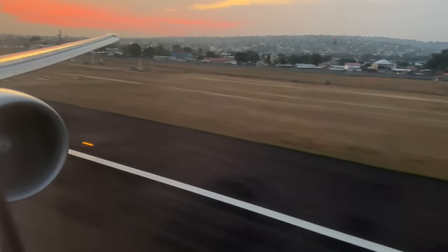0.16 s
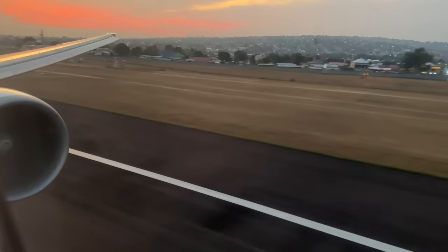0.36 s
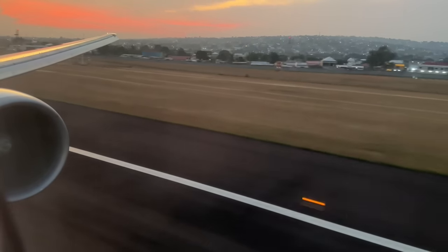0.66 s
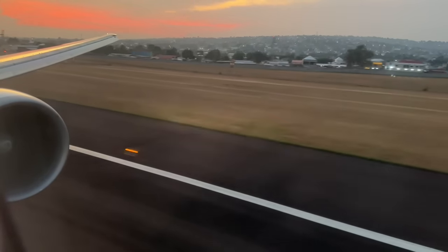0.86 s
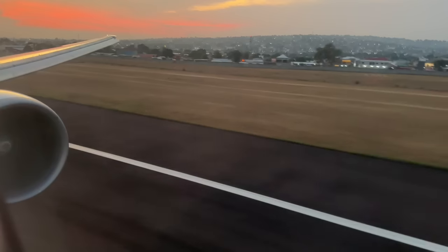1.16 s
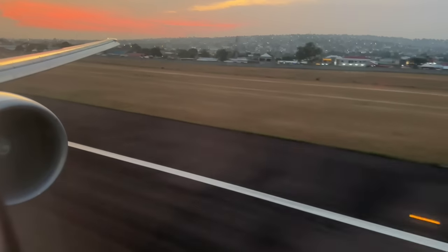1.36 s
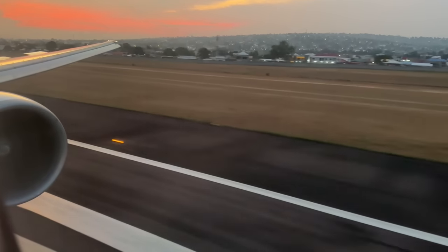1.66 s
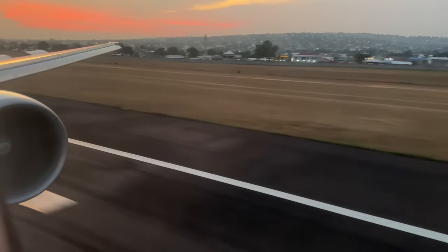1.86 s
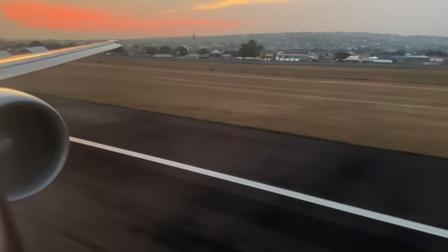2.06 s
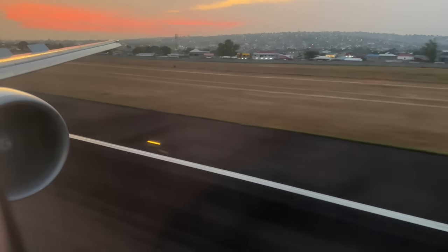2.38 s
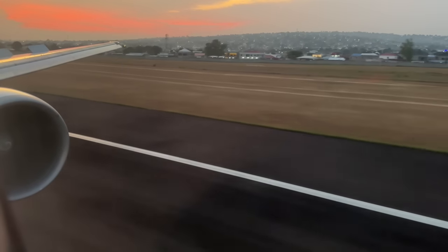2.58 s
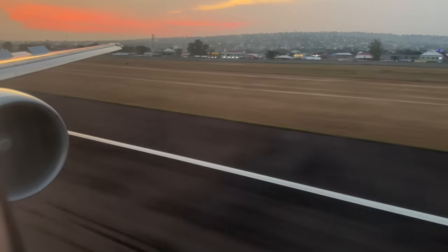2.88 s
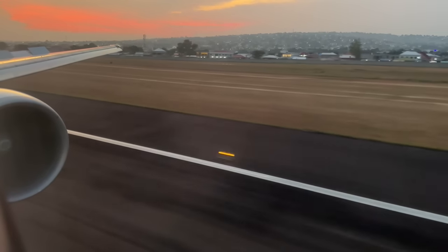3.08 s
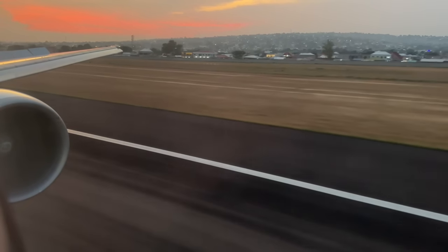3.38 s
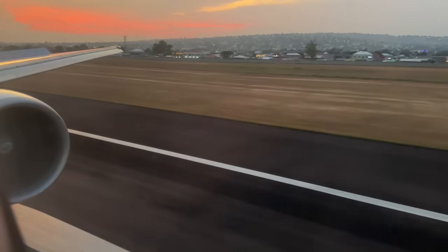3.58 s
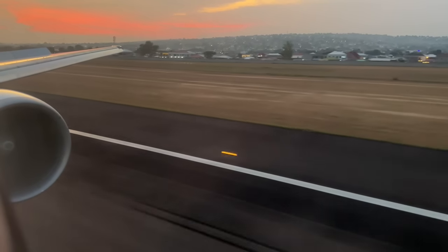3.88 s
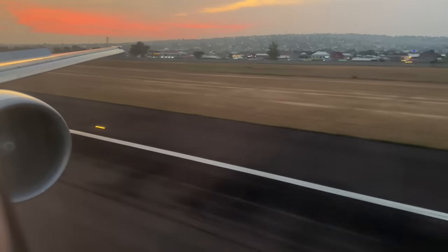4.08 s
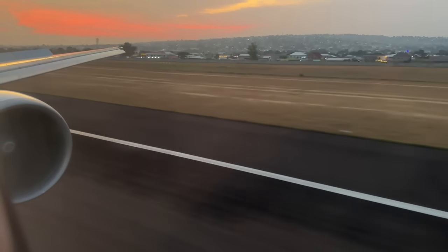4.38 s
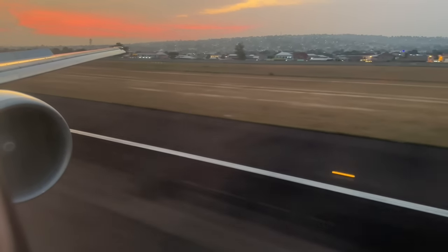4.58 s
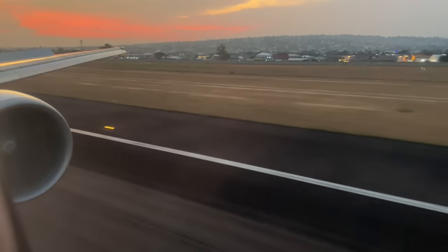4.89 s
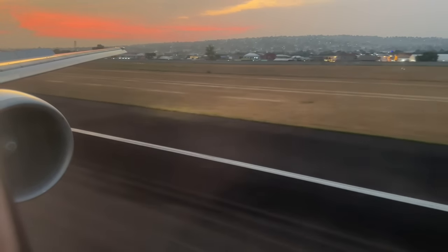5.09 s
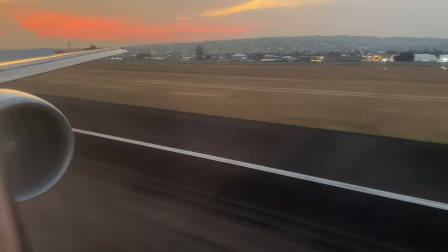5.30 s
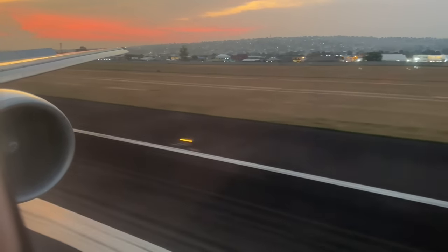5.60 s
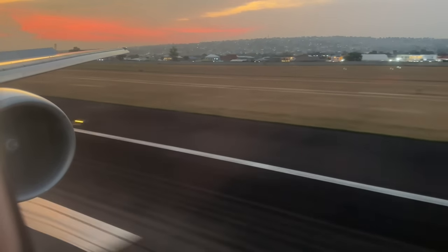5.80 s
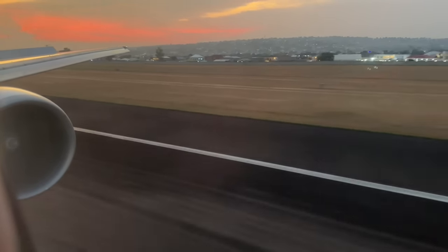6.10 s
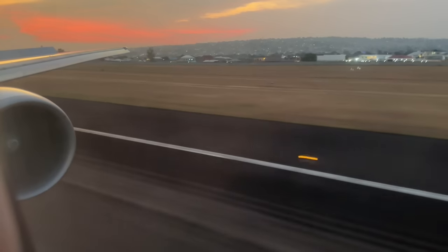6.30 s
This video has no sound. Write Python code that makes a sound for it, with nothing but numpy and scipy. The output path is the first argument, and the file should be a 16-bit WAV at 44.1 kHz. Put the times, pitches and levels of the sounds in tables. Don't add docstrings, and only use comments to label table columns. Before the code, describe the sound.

Heavy low-frequency rolling noise fills an aircraft cabin, recorded in stereo at a passenger seat. Soft broadband air noise lies over it and faint high turbine tones slide downward. Small hard plastic knocks, dry clicks and tiny piercing squeaks scatter throughout, some near, some farther off with a short cabin tail. Deep thumps come when the wheels cross joints, early and again near the end, shaking the panels into chatter.

```python
import sys
import numpy as np
from scipy import signal
from scipy.fft import rfft, irfft, next_fast_len
from scipy.io import wavfile
from scipy.ndimage import uniform_filter1d, map_coordinates

SR = 44100
rng = np.random.default_rng(int(sys.argv[2]) if len(sys.argv) > 2 else 0)


def how_loud(loudness_db):
    steps = np.asarray(loudness_db, float) / 20
    return 10 ** steps


def generate_wav(signal):
    frames = np.transpose(np.atleast_2d(signal))
    scaled = np.clip(frames, -1, 1) * 32767
    pcm = np.round(scaled).astype(np.int16)
    wavfile.write(sys.argv[1], SR, pcm)


N = 284445
TIME = np.arange(N) / SR
STEP_S = 0.09

# [f/Hz, lead/rad]
PORT_LEAD = [(200, 0), (280, .17), (420, .05), (500, .4), (620, 2.2), (1000, 1.8), (1200, 2), (1500, 4.3),
             (3000, 7.7), (4700, 12.05), (6900, 24.2), (7900, 26.2), (9000, 27.8), (9500, 28.4),
             (12200, 31.4), (13200, 32.1), (14900, 34.6), (15700, 36.2)]


def unit(x):
    return x / np.sqrt(np.mean(x ** 2) + 1e-20)


def along(points, hz):
    f, v = np.transpose(points)
    return np.interp(np.log(hz + 1), np.log(f + 1), v)


def wobble(rate, size=N):
    knots = rng.standard_normal(int(size * rate / SR) + 4)
    return map_coordinates(knots, [np.arange(size) * rate / SR])


def filtered(x, response):
    m = next_fast_len(N + 8192)
    return irfft(rfft(x, m) * response(np.fft.rfftfreq(m, 1 / SR)), m)[..., :N]


def rush(spectrum, patchy_db, grain=1):
    # [f/Hz, level/dB]
    apart = [(20, -33), (130, -23), (240, -13), (300, -14), (430, -3), (500, -6), (580, -2.7), (750, -7.5),
             (950, -8.5), (1400, -2.7), (2000, -2), (8200, -2), (9100, -18), (16000, -20)]
    # [f/Hz, level/dB]
    balance = [(60, 0), (110, -1.0), (200, -4), (380, -2), (700, -6.5), (1290, -6.5), (2380, -3),
               (4400, -8.5), (8120, -5), (15000, -12)]
    z = signal.stft(grain * rng.standard_normal((2, N)), nperseg=512)[2]
    patches = uniform_filter1d(rng.standard_normal(z.shape[1:]), 6, 0)
    patches = unit(uniform_filter1d(patches, 14, 1))
    pair = signal.istft(z * how_loud(patchy_db * patches), nperseg=512)[1][:, :N]

    def common_and_apart(hz):
        angle = np.arctan(how_loud(along(apart, hz)))
        return how_loud(along(spectrum, hz)) * [np.cos(angle), np.sin(angle)]

    def ports(hz):
        left = how_loud(along(balance, hz) / 2) * np.exp(0.5j * along(PORT_LEAD, hz))
        return [left, 1 / left]

    common, differing = filtered(pair, common_and_apart)
    return unit(filtered(np.array([common + differing, common - differing]), ports))


def placed(x, pan_db):
    def ports(hz):
        left = how_loud(pan_db / 2) * np.exp(0.5j * along(PORT_LEAD, hz))
        return np.array([left, 1 / left])

    return filtered(x, ports)


def echoes(x):
    # [f/Hz, t60/s]
    decay = [(500, 0.022), (4000, 0.14), (9000, 0.1)]
    hz, t, z = signal.stft(rng.standard_normal((2, SR // 3)), SR, nperseg=256)
    fade = how_loud(-60 * t / along(decay, hz)[:, None])
    tail = signal.istft(z * fade, SR, nperseg=256)[1]
    return signal.fftconvolve(x[None], tail / np.linalg.norm(tail[0]), axes=1)[:, :N]


def swells(rows, sudden):
    u = np.array([(TIME - s) / max(length, 0.01) for s, length in rows])
    return np.exp(-np.where(u < 0, sudden * u, u) ** 2)


def joints(lag_s=0, slow=1):
    # [t/s, heave/dB, length/s]
    bumps = [
        (0.474, 8.5, 0.065),
        (1.327, 6.5, 0.23),
        (5.75, 2.5, 0.52),
        (6.17, 9, 0.1),
    ]
    s, db, length = np.transpose(bumps)
    return db @ swells(zip(s + lag_s, slow * length), 1)


def cabin_air():
    # [f/Hz, level/dB per Hz]
    roar = [(240, -16), (400, -5), (992, -11), (1070, -17), (1330, -12), (1600, -18), (1860, -23),
            (2070, -21.5), (2750, -23), (3150, -25.5), (4700, -29.5), (6390, -38), (9100, -39),
            (10400, -46.5), (11500, -54.5), (13000, -55), (15000, -50.5), (16200, -54.5)]
    return how_loud(-33 + 0.22 * joints(lag_s=0.22, slow=1.3)) * rush(roar, patchy_db=1.1)


def whine(pitches, levels, stray_hz, pan_db, flutter_db):
    out = np.zeros(N)
    for (hz, sag_hz, settle_s), (first_db, step_s, then_db, end_s, last_db) in zip(pitches, levels):
        size = min(N, round(end_s * SR))
        t = np.arange(size) / SR
        pitch = hz - sag_hz * (1 - np.exp(-t / settle_s)) + stray_hz * wobble(13, size=size)
        db = np.interp(t, [step_s - STEP_S, step_s, end_s], [first_db, then_db, last_db])
        db += 0.7 * wobble(9.7, size=size) + flutter_db * wobble(40, size=size)
        fade = np.clip((end_s - t) / 0.063, 0, 1)
        tone = np.sin(2 * np.pi * np.cumsum(pitch) / SR)
        out[:size] += fade * np.sqrt(2) * how_loud(db) * tone
    return placed(out, pan_db) + how_loud(-18) * echoes(out)


def engines():
    # [f/Hz, total sag/Hz, settling/s]
    spool_hz = [(3551, 62, .45), (3551, 62, .45), (3870, 120, 7), (3870, 120, 7), (3136, 60, 1),
                (2727, 170, 7), (2727, 170, 7)]
    pump_hz = [(2153, -6, 2), (2526, 2, 1), (4306, -13, 2.2)]
    hum_hz = [(348.5, 5, 2), (398, 0, 1), (400, 0, 1)]
    fan_hz = [(4408, 800, 7), (4408, 800, 7)]
    # [first level/dB, step t/s, level after it/dB, end t/s, last level/dB]
    spool_db = [(-43, .27, -47, .53, -48), (-80, .55, -57, .85, -60), (-63, 2.15, -58, 2.34, -58),
                (-80, 2.55, -60, 2.7, -60), (-60, .47, -49, 1.2, -56), (-57, .36, -48.5, 1.01, -55),
                (-80, 1.1, -59, 1.8, -60)]
    pump_db = [(-60, 2.4, -57, 6.6, -57.5), (-66, 2.55, -58.5, 5, -63), (-76, 2.2, -69, 5.8, -64)]
    hum_db = [(-31.5, 1.02, -34, 2.05, -34.5), (-44, .28, -39, .64, -39), (-52, 2.9, -42, 4, -43)]
    fan_db = [(-63, .75, -57.5, 1.9, -57), (-70, 2.28, -55, 3.02, -57)]
    out = whine(spool_hz, spool_db, stray_hz=2.5, pan_db=-9.0, flutter_db=2.8)
    out += whine(pump_hz, pump_db, stray_hz=1.63, pan_db=-5.5, flutter_db=0.0)
    out += whine(hum_hz, hum_db, stray_hz=1, pan_db=-2, flutter_db=1)
    return out + whine(fan_hz, fan_db, stray_hz=1.5, pan_db=-9, flutter_db=0.8)


def sparks():
    # [t/s, peak level/dB]
    clicks = [(0.4539, -49), (0.5247, -62), (1.0261, -51), (1.058, -45.5), (1.1139, -51), (1.1907, -53),
              (1.288, -46), (1.3306, -51), (1.4471, -57), (1.495, -51), (1.7404, -43), (1.862, -55),
              (2.007, -52), (2.4668, -56), (2.8345, -54), (4.274, -55), (5.2779, -48), (6.2127, -47)]
    colour = [(7000, -36), (9000, -3), (10300, -8), (12500, 1.0), (15000, 4.0), (16000, -26.0)]  # Hz, dB
    out, t = np.zeros(N + SR), np.arange(SR // 50) / SR
    for s, db in clicks:
        burst = how_loud(db + 8.5 - 60 * t / 0.0088) * rng.standard_normal(len(t))
        out[round(s * SR):][:len(t)] += burst
    return filtered(out[:N], lambda hz: how_loud(along(colour, hz)))


def ticks():
    # [t/s, peak level/dB, brightness/dB, t60/s]
    knocks = [(0.5365, -35.5, -11, 0.047), (0.6348, -35.5, -7.5, 0.033), (1.0657, -42, -2, 0.04),
              (1.113, -33, -17, 0.054), (1.128, -40.5, -14, 0.023), (1.261, -37, -17, .025),
              (1.284, -39.5, -17, 0.024), (1.304, -35, -15, 0.023), (1.4903, -32.5, -17, .025),
              (1.435, -35, -19, 0.023), (1.3348, -37, -7, 0.048), (1.509, -35, -20.5, 0.052),
              (1.818, -36.5, -10, 0.04), (1.8606, -21.5, -14.5, 0.03), (1.871, -31, -23, .03),
              (2.028, -37, -19, .03), (2.259, -36.5, -22, 0.035), (2.287, -36, -19, 0.027),
              (1.943, -31, -8, 0.015), (3.312, -33.5, -22, 0.045), (3.64, -31.5, -13, 0.032),
              (3.704, -34.5, -10, 0.04), (4.4407, -28.5, -23, 0.022), (4.7202, -33, -15, 0.035),
              (5.163, -37.5, -10.5, 0.032), (5.226, -38.5, -7.5, 0.037), (5.699, -34.5, -11.5, 0.029),
              (5.9024, -37.5, -16, 0.059), (6.128, -27.5, -26, 0.019), (6.152, -34, -11, 0.033),
              (6.253, -35, -16.5, 0.036), (6.297, -39.5, -15.5, 0.035), (6.109, -35, -23, .025),
              (6.209, -34, -14, .025), (6.266, -37.5, -19, .025), (6.347, -37, -18, .03),
              (5.116, -37, -20, 0.033)]
    body = [(500, -26), (850, -1.5), (1200, 6.5), (1700, -0.5), (2700, -2), (4200, -7.5), (6500, -30)]
    edge = [(3500, -21.0), (5000, 9.5), (8500, -2.5), (10300, -27.0), (13000, -19.5), (15800, -28.5)]
    dull, bright, t = np.zeros(N + SR), np.zeros(N + SR), np.arange(SR // 8) / SR
    for s, db, bright_db, t60 in knocks:
        start = round(s * SR)
        shape = how_loud(-60 * t / max(t60, 0.005)) * (1 - np.exp(-t / 0.0011))
        impact = 3 * (t == t[20])
        dull[start:][:len(t)] += how_loud(db + 9.0) * (shape * rng.standard_normal(len(t)) + impact)
        bright[start:][:len(t)] += how_loud(db + bright_db + 8.0) * shape * rng.standard_normal(len(t))
    dull = filtered(dull[:N], lambda hz: how_loud(along(body, hz)))
    return dull + filtered(bright[:N], lambda hz: how_loud(along(edge, hz)))


def squeaks(rows, length, pan_db, stray, octave_db=-19.5):
    out, size = np.zeros(N + SR), SR // 8
    t = np.arange(size) / SR
    envelope = (1 - np.exp(-t / 0.002)) * np.exp(-(t / max(length, 0.004)) ** 1.9)
    for s, db, hz in rows:
        phase = 2 * np.pi * np.cumsum(hz * (1 + stray * wobble(220, size=size))) / SR
        grip = how_loud(3.8 * wobble(240, size=size)) * envelope
        whistle = np.sin(phase) + how_loud(octave_db) * np.sin(2 * phase)
        out[round(s * SR):][:size] += how_loud(db - 3.0) * grip * whistle
    return how_loud(np.array([[pan_db / 2], [-pan_db / 2]])) * out[:N]


def housed(pair, wet_db, spread):
    a, b = how_loud(wet_db) * echoes(pair.mean(0))
    return placed(pair + [a + spread * b, a - spread * b], pan_db=-2)


def near_squeaks():
    # [t/s, peak level/dB, f/Hz]; first the seat frame, in firm slips and faint ones
    frame = [(.303, -45, 7930), (.362, -32, 7940), (.8852, -38, 8220), (.909, -32, 8040),
             (1.165, -40, 7820), (1.19, -39, 8400), (1.202, -32, 7920), (1.286, -26, 8200),
             (1.745, -40.5, 7620), (2.337, -30.5, 7740), (3.298, -28.5, 7760), (3.372, -41, 7740),
             (3.721, -39.5, 7960), (3.854, -29.5, 7880), (3.997, -45, 8030), (4.129, -34, 7600),
             (4.356, -33.5, 7630), (4.3834, -33, 7980), (4.575, -27, 8100), (4.6912, -41.5, 7980),
             (4.985, -41, 8020), (5.479, -42.5, 7830), (6.296, -31, 7890),
             (.396, -47, 8240), (1.972, -39.5, 7730), (2.65, -49, 7800), (2.722, -36, 7600),
                   (3.258, -46.5, 7800), (5.615, -52, 7740)]
    frame_long = [(1.598, -43, 7690), (2.001, -25.5, 7840), (2.365, -32, 8050), (2.693, -34.5, 7980),
                  (2.923, -37, 7600), (3.053, -29.5, 7820), (4.078, -39, 7860), (4.858, -36.5, 7940)]
    panel_joint = [(.504, -32, 8500), (.998, -38, 8330), (1.055, -36, 8660), (1.1872, -31, 9400),
                   (1.249, -32, 9270), (1.2864, -42, 9700), (1.326, -33, 8800), (5.761, -42.5, 7640),
                   (6.068, -35, 8470), (6.208, -31.5, 8520)]
    latch = [(.449, -35, 8940), (.553, -31, 9140), (1.109, -19.5, 9090), (1.432, -23.5, 8980),
             (1.457, -33, 8920), (2.076, -30, 9020), (2.468, -29, 9220), (2.828, -29, 8980),
             (3.197, -31.5, 9300), (3.67, -36, 9320), (4.542, -41, 9560)]
    near = squeaks(frame, 0.013, pan_db=3.0, stray=0.012)
    near += squeaks(panel_joint, 0.016, pan_db=4.5, stray=0.0084)
    near += squeaks(frame_long, 0.028, pan_db=1.5, stray=0.011)
    near += squeaks(latch, 0.015, pan_db=-2.0, stray=0.016)
    return housed(near, wet_db=-3.0, spread=0.37)


def far_squeaks():
    # [t/s, peak level/dB, f/Hz]
    lid = [(.458, -44, 4790), (.577, -46, 4750), (1.068, -42, 4650), (1.113, -37, 4830), (1.178, -34, 4700),
           (1.197, -33, 4750), (1.283, -30, 4750), (1.727, -30.5, 4600), (1.983, -37, 4720),
           (1.997, -40, 4700), (2.58, -49, 4910), (3.0874, -48, 4740), (3.669, -38, 4630),
           (3.703, -36, 4860), (4.545, -34.5, 4700), (4.83, -38.5, 4630), (5.1203, -41, 5040),
           (5.583, -42, 4750), (5.594, -40.5, 4720), (5.698, -42, 4800), (6.1858, -35, 4900),
           (6.245, -40, 4650), (6.317, -42, 4800), (6.331, -38, 4900), (6.369, -44, 4650),
           (6.41, -36.5, 4920)]
    other = [(1.178, -35, 5780), (3.818, -37, 5880), (4.021, -36, 5880), (4.266, -30.5, 5890),
             (5.055, -49, 5900), (5.303, -47, 6030), (6.359, -33.5, 6040)]
    thick_panel = [(1.164, -32.5, 3900), (1.1, -33.5, 2080), (1.6, -31.5, 3800), (1.822, -37, 2510),
                   (2.3, -38, 2150), (1.7, -33, 3750), (1.5, -30, 2680), (1.862, -33, 4020),
                   (1.435, -37, 2000), (5.345, -42, 2700), (6.315, -32, 3000), (6.13, -33, 2800)]
    far = squeaks(lid, 0.013, pan_db=-7, stray=0.018, octave_db=-30)
    far += squeaks(other, 0.013, pan_db=-0.5, stray=0.004, octave_db=-27)
    far += squeaks(thick_panel, 0.02, pan_db=-1, stray=0.015)
    return housed(far, wet_db=-8, spread=1.0)


def chatter():
    # [f/Hz, level/dB per Hz]
    buzz = [(300, -48), (600, 12.5), (1400, 3.5), (2700, -3.5), (3200, -6.5), (4800, -5), (6500, -13.5),
            (9200, -11.5), (10400, -41), (13000, -33.5), (15300, -27), (16500, -120)]
    # [t/s, level/dB, length/s]
    jolts = [(0.578, -35.5, 0.028), (0.89, -42.5, 0.22), (1.058, -37.5, 0.025), (1.117, -36.5, 0.046),
             (1.206, -32.5, 0.059), (1.324, -38, 0.09), (1.48, -47, 0.089), (1.858, -32, 0.015),
             (1.977, -37, 0.084), (2.269, -52, 0.074), (2.373, -46, 0.065), (2.58, -44.5, 0.055),
             (2.732, -48, .02), (2.937, -58, 0.016), (3.079, -37.5, 0.044), (3.353, -37.5, 0.11),
             (3.677, -45, 0.046), (3.977, -42.5, 0.1), (4.15, -42, 0.045), (4.413, -40.5, 0.16),
             (4.7, -47, 0.2), (5.147, -40, 0.067), (5.229, -43, .03), (5.67, -47.5, 0.043),
             (6.132, -35.5, .02), (6.166, -41.5, 0.053), (6.298, -37, 0.11), (6.362, -40.5, 0.13)]
    s, db, length = np.transpose(jolts)
    shake = how_loud(-54.5 + 1.95 * joints())
    shake += how_loud(db) @ swells(zip(s, length), sudden=1.97)
    contacts = how_loud(3.0 * wobble(300) + 2.2 * wobble(45))
    return shake * rush(buzz, patchy_db=2.5, grain=contacts)


def airframe():
    # [t/s, level/dB]
    roll = [(0, -17.5), (1, -17.5), (1.7, -17), (2.3, -17), (3.3, -15.5), (4.2, -16), (4.8, -14),
            (5.4, -13), (5.85, -14.5), (6.15, -13), (6.45, -14.5)]
    # [f/Hz, level/dB per Hz]
    bending = [(8.8, -44), (15, -17), (70, -0.5), (91, -16.5), (150, -120)]
    shell = [(32, -20), (55, -6.5), (81, 1), (140, -0.5), (188, -3.5), (221, -11), (235, -19), (310, -30.5),
             (520, -120)]
    walls = [(130, -38), (220, -14.5), (231, -10.5), (258, 0), (280, 1), (316, -2.5), (393, -11.5),
             (415, -25), (460, -15), (600, -47), (1010, -120)]
    drum_db = np.interp(TIME, *np.transpose(roll))
    mean_db = drum_db.mean()
    more_db = drum_db - mean_db
    reverse = np.clip((TIME - 1.6) / STEP_S, 0, 1)
    heave_db = mean_db - 8.5 + 0.95 * more_db + joints()
    panel_db = mean_db - 12.5 + 0.93 * more_db + 2.5 * reverse
    uneven = wobble(9)
    heave = how_loud(heave_db + 0.19 * uneven) * rush(bending, patchy_db=0.5)
    drum = how_loud(drum_db + 0.38 * uneven) * rush(shell, patchy_db=0.0)
    panel = how_loud(panel_db + 0.45 * uneven) * rush(walls, patchy_db=0.8)
    return heave + drum + panel


def scene():
    knocks = ticks()
    trim = placed(sparks(), pan_db=3.0) + placed(knocks, pan_db=-8.0) + how_loud(2.5) * echoes(knocks)
    trim += near_squeaks() + far_squeaks() + chatter()
    return cabin_air() + engines() + trim + airframe()


def gated(x, floor_db, under_db, from_hz):
    # [f/Hz, level/dB]
    raised_floor = [(8700, 0), (8950, 14), (9600, 11), (10000, 13), (10500, 9), (11300, 4), (12200, 0),
                    (13600, 1), (14600, 7), (15300, 10), (15700, 6)]
    both = np.array([x[0] + x[1], x[0] - x[1]]) / 2
    hz, _, z = signal.stft(both, SR, nperseg=2048)
    start = np.arange(0, len(hz), 10)
    power = np.add.reduceat(np.abs(z) ** 2, start, axis=1) / 10
    treble = (hz[start] > from_hz)[:, None]
    loudest = (power * treble).max(axis=(0, 1))
    whim = how_loud(3.5 * rng.standard_normal(power.shape))
    floor = how_loud(2 * (floor_db + along(raised_floor, hz[start])[:, None]))
    drop = treble & (power < whim * np.maximum(floor, how_loud(2 * under_db) * loudest))
    kept = ~np.repeat(drop, 10, axis=1)[:, :len(hz)]
    mid, side = signal.istft(z * kept, SR, nperseg=2048)[1][:, :N]
    return np.array([mid + side, mid - side])


def top_cut(x):
    return signal.sosfilt(signal.butter(12, 15850, fs=SR, output="sos"), x)


def record(dry):
    soft = dry / (1 + np.abs(dry / 0.76) ** 4) ** (1 / 4)
    soft = filtered(soft, lambda hz: hz < 15830)
    mix = gated(soft, floor_db=-98.5, under_db=-38, from_hz=6500)
    return top_cut(mix)


dry = scene()
out = record(dry)
generate_wav(out)
```